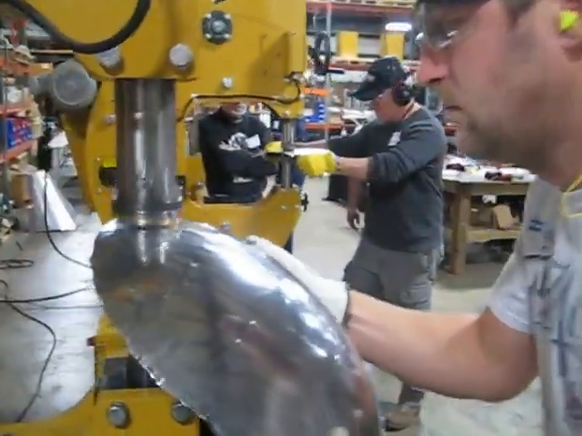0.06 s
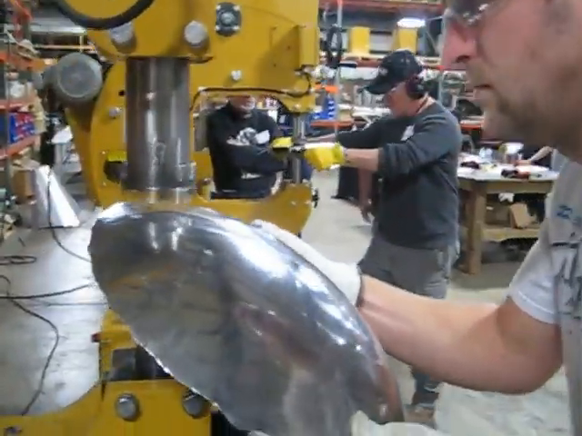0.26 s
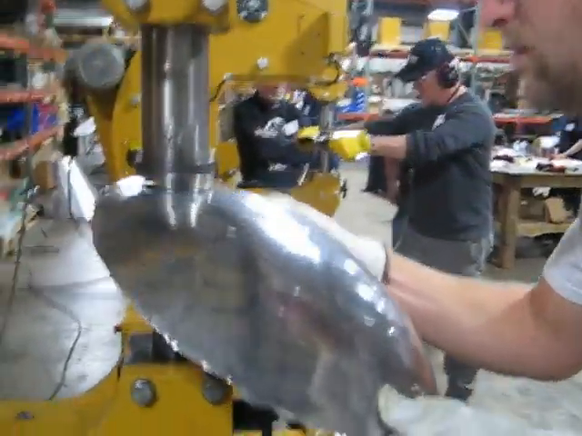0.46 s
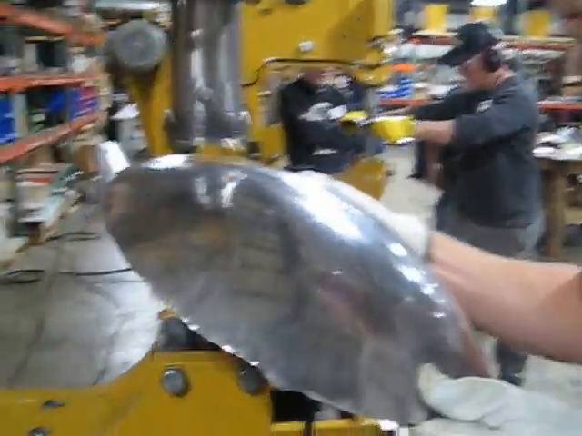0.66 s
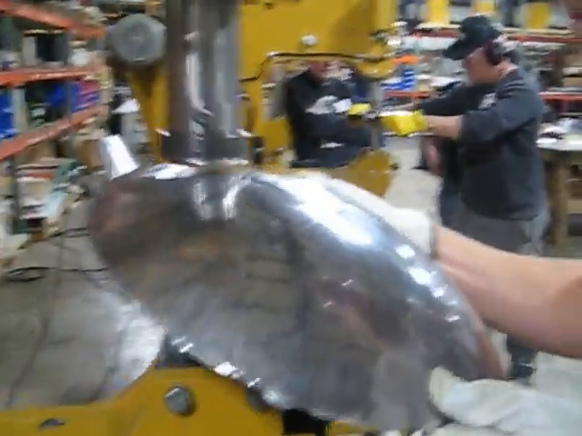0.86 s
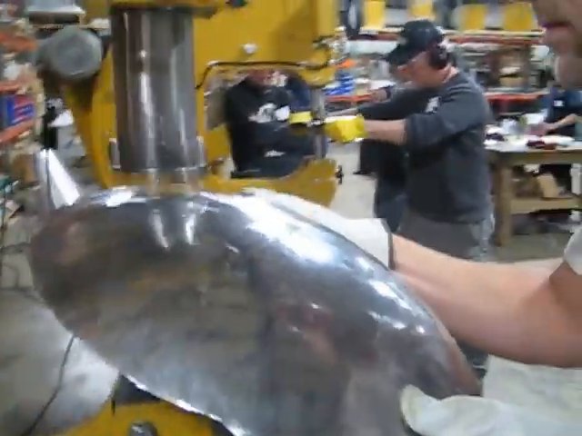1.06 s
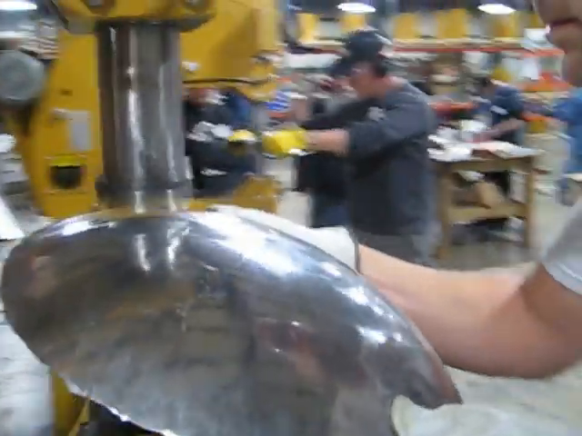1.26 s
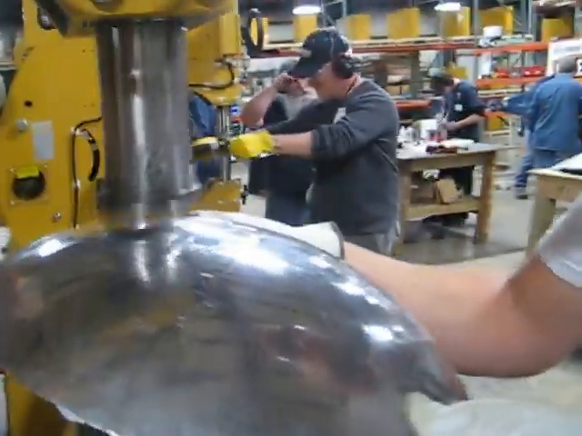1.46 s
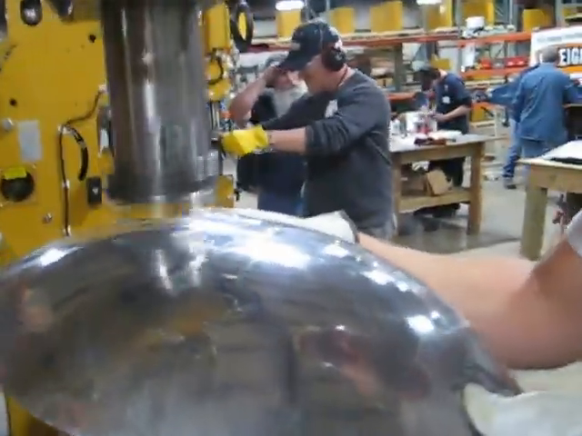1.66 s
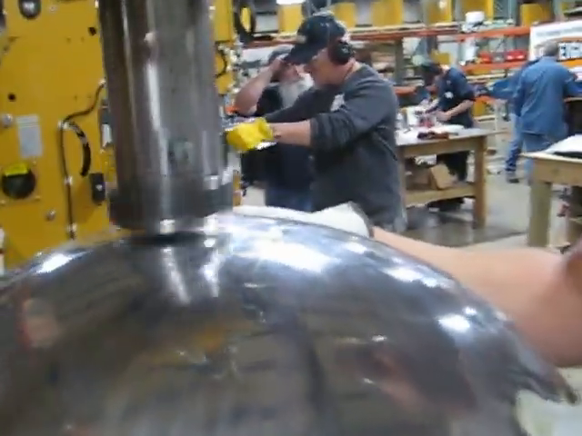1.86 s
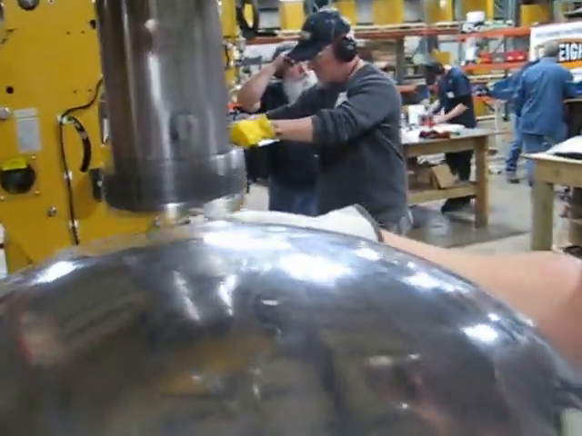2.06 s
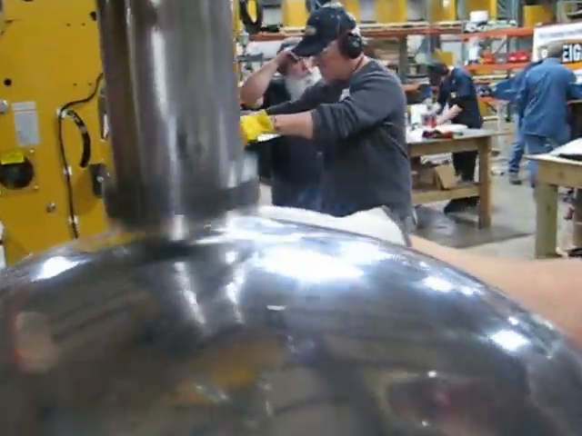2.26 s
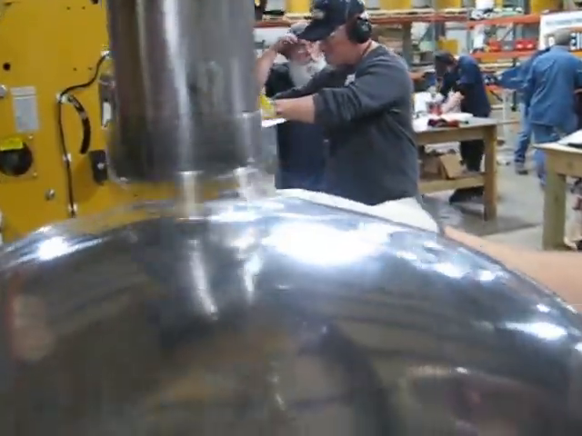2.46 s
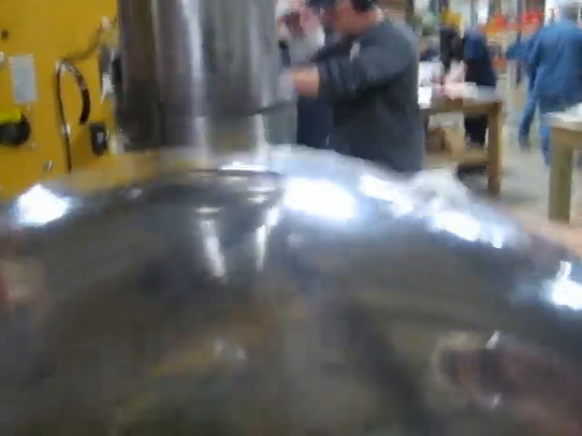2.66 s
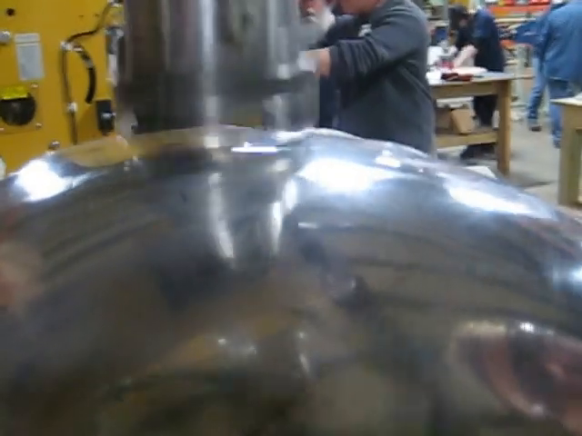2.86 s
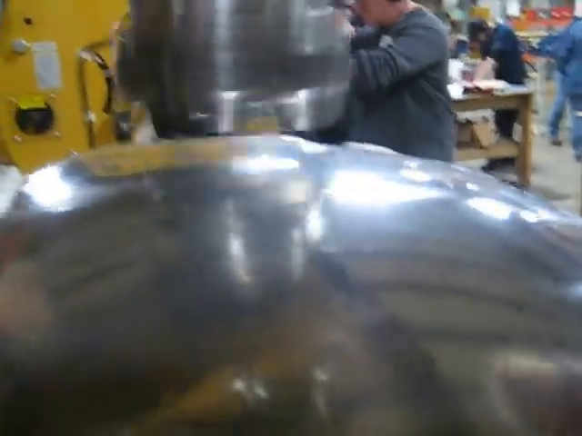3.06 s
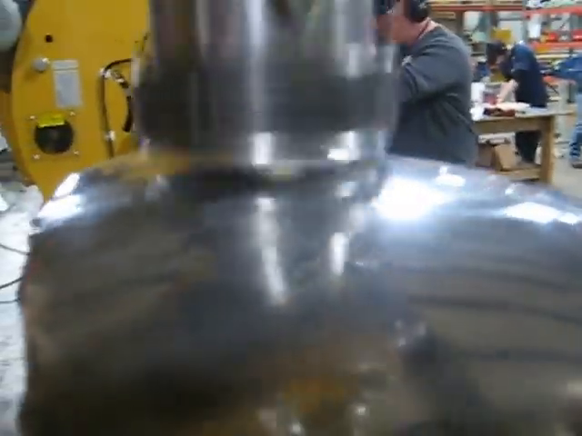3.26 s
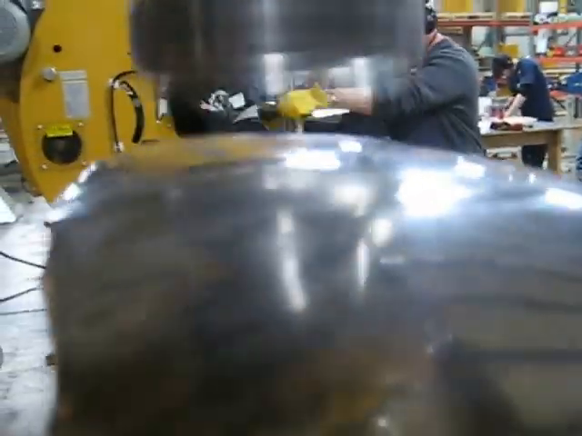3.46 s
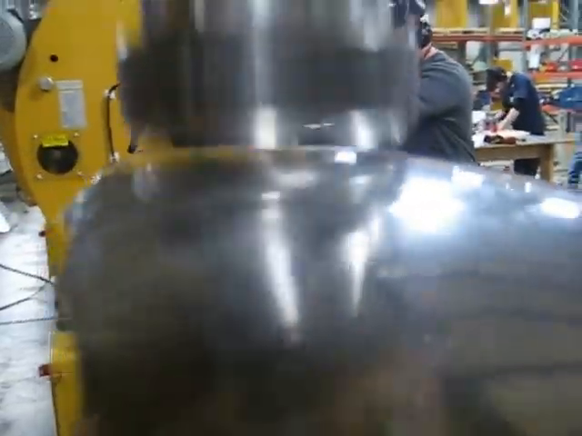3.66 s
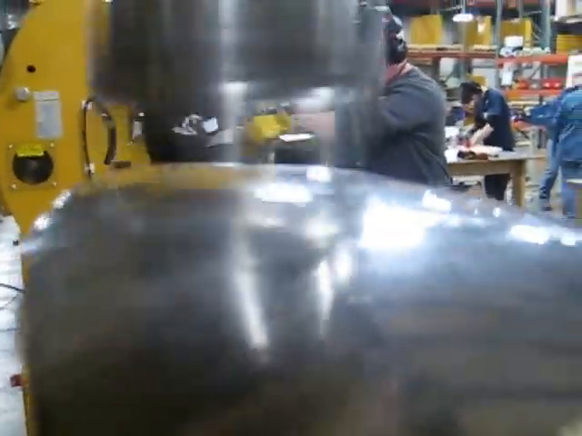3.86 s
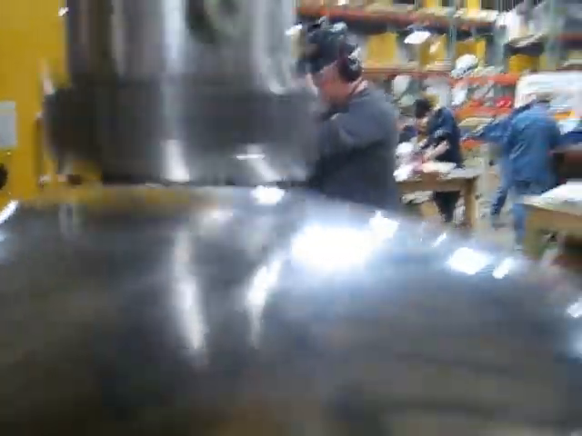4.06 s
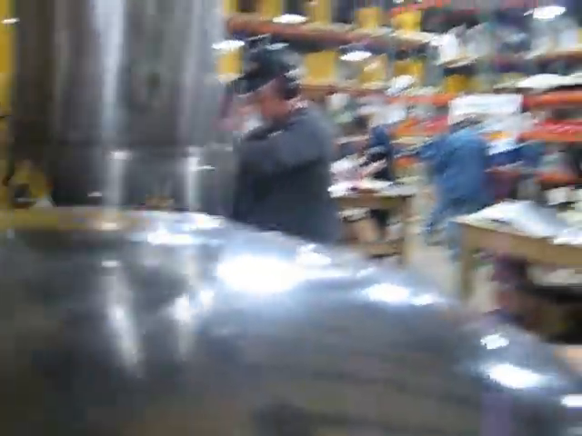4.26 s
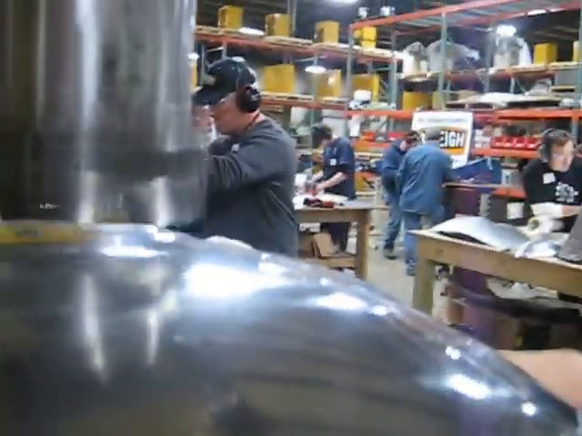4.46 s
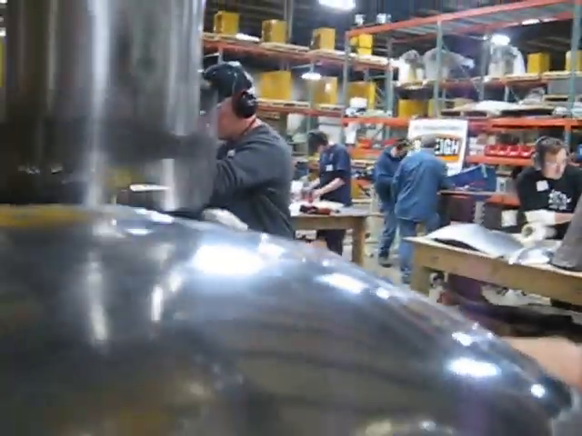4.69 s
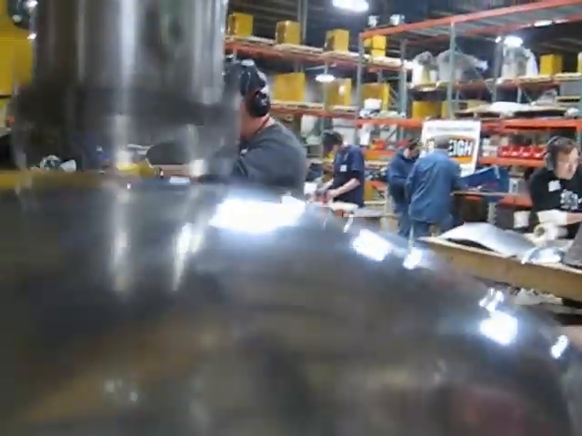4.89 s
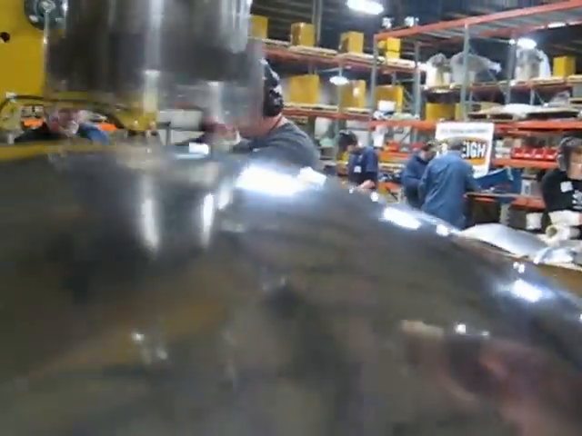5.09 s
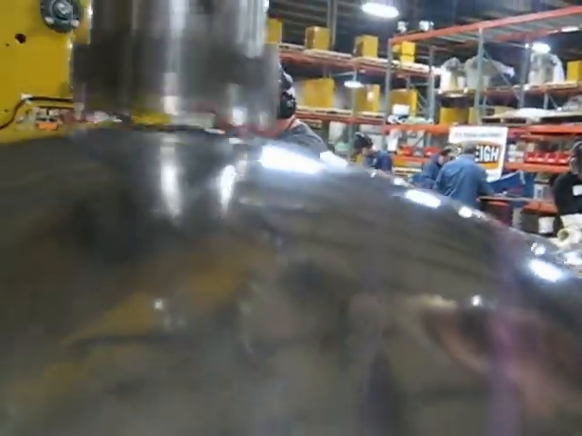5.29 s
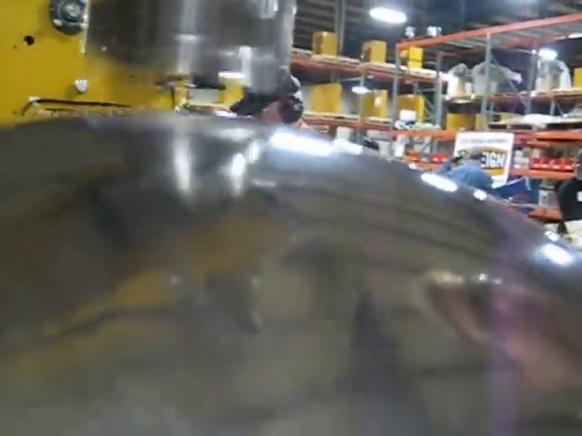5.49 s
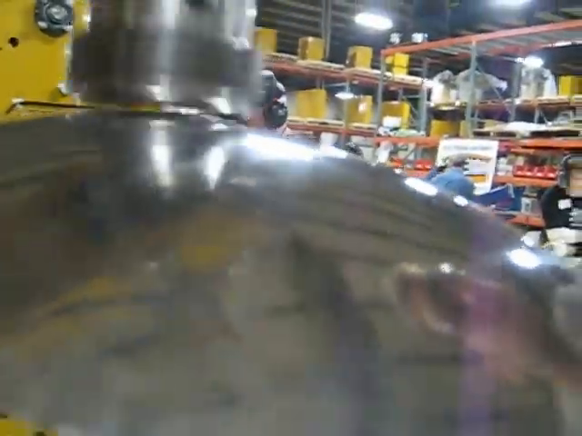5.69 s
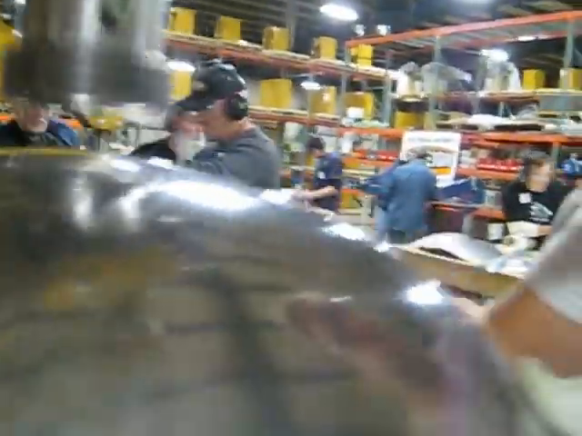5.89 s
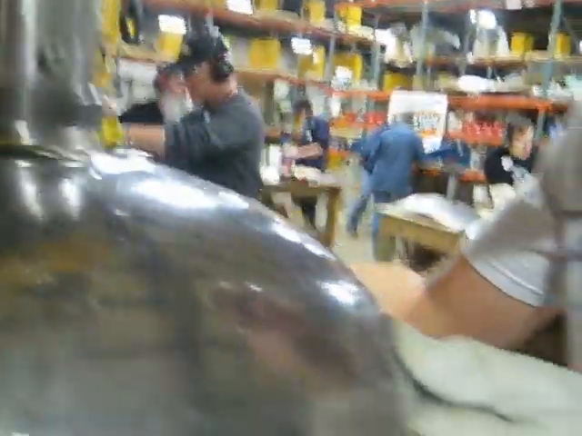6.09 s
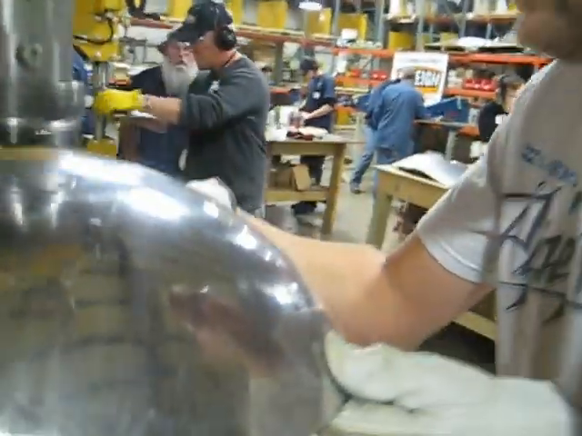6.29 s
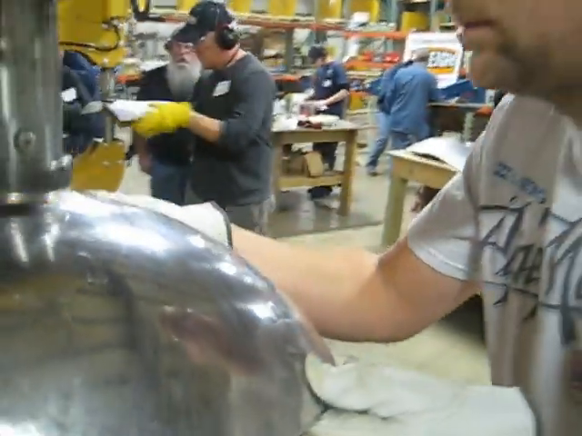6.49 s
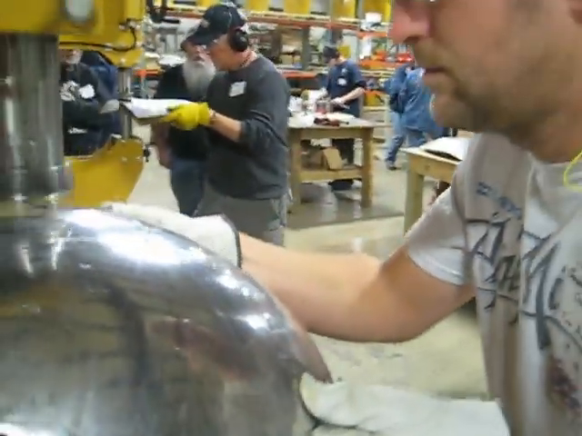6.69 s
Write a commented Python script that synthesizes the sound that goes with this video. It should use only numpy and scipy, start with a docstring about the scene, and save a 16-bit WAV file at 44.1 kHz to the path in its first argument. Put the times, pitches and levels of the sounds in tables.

```python
"""A power hammer planishes a domed, hand-damped metal panel, nearly thirteen blows a second, in a large workshop.
Each blow rings panel and dies (decaying modes, a hollow dome note, a clang, a noise crack and a rim chirp);
a panel caught off its seat thumps, and the linkage knocks before each blow.
Behind it lie a droning frame, the hall's decaying-noise reverberation and steady shop noise.
The microphone moves from arm's length to close by the dies, where air puffs reach it and peaks overload, then backs off."""
import sys
import numpy as np
from scipy import signal
from scipy.fft import rfft, irfft
from scipy.io import wavfile

SR = 44100
rng = np.random.default_rng(int(sys.argv[2]) if len(sys.argv) > 2 else 0)


def inscribe(sig):
    """Save sig as 16-bit PCM at rate SR to the path in sys.argv[1].

    A 1-D sig is mono; a 2-D sig holds one channel per row.
    Samples are clipped to [-1, 1] before scaling.
    """
    pcm = np.round(np.clip(np.atleast_2d(sig).T, -1, 1) * 32767)
    wavfile.write(sys.argv[1], SR, pcm.astype(np.int16))


N = 297234
LEAD = SR  # samples: a second of lead-in; the hammer starts about three quarters of a second early
TOTAL = N + LEAD
CUTOFF_HZ = 15800


def from_db(db):
    """Decibels to gain."""
    return 10 ** (np.asarray(db) / 20)


def at_time(points, s):
    """Read a curve at the given times."""
    return np.interp(s, *np.transpose(points))


def at_hz(points, hz):
    """Read the columns of a table along a log-frequency axis."""
    knots, *columns = np.transpose(points)
    return [np.interp(np.log(hz + 1e-9), np.log(knots), column) for column in columns]


def noise(colour, size):
    """Noise of rms 1 whose spectrum follows the given colour."""
    gain = from_db(at_hz(colour, np.fft.rfftfreq(size, 1 / SR))[0])
    x = irfft(rfft(rng.standard_normal(size)) * gain, size)
    return x / x.std()


def dying(t, t60):
    """Exponential decay, down 60 dB after t60 seconds."""
    return np.exp(-np.log(1000) * t / t60)


def nearest(times, wanted):
    """Which blow falls closest to each wanted time."""
    return np.abs(times[:, None] - wanted).argmin(axis=0)


def place(times, sounds):
    """Lay one sound at each time."""
    out = np.zeros(TOTAL + SR)
    for s, sound in zip(times, sounds):
        start = int(round(s * SR)) + LEAD
        out[start:start + len(sound)] += sound
    return out[:TOTAL]


# microphone position: t/s, closeness to the dies (0 = arm's length, 1 = close up)
MIC_CLOSENESS = [(0, 0), (.9, 0.05), (1.7, 0.23), (2.05, 0.35), (3.5, 1), (4.1, 0.93), (6.3, 0.54),
                 (6.74, 0.3)]


def closeness(s):
    """How near the microphone stands to the dies at the given times."""
    return at_time(MIC_CLOSENESS, s)


# the motor labours a little as the work goes on: t/s, rate/(blows per second)
BLOW_RATE = [(0, 12.8496), (3.2, 12.8606), (3.7, 12.7792), (4.2, 12.7252), (4.7, 12.7726), (5.3, 12.6521),
             (6.1, 12.6451)]
FIRST_BLOW_S = .0526


def beat(count=10):
    """One blow per turn of the crank, starting a few turns early."""
    times = [FIRST_BLOW_S - count / BLOW_RATE[0][1]]
    while times[-1] < N / SR:
        times.append(times[-1] + 1 / at_time(BLOW_RATE, times[-1]))
    return np.array(times[:-1])


# how hard the dies bite as the panel is fed along, before scatter: t/s, level/dB
BITE = [(0, -4), (.65, -3), (.92, -1.9), (1.2, -4), (1.7, -3.5), (1.87, -1.1), (2.2, -1), (2.6, 0.5),
        (3.2, 1.4), (3.65, -3), (4.05, 1.9), (4.4, -0.2), (4.88, 1.5), (5.45, -2.5), (5.8, -3.5), (6.1, -4),
        (6.25, -0.8), (6.74, -2.5)]
# treble against the rest of the blow, before scatter: t/s, level/dB
TREBLE = [(0, -1.5), (.95, -0.9), (1.5, 0.2), (1.92, -1), (2.15, 1), (2.7, 0), (3.2, 1), (3.62, 10),
          (4.05, 3.5), (5.35, 2), (5.97, 5.5), (6.4, 0), (6.74, -0.3)]
# air puff at the microphone, relative and before scatter: t/s, level/dB
PUFF_LEVEL = [(0, -35), (.9, -18), (2.1, -18), (2.95, -3.5), (3.9, -0.5), (4.7, -5), (5.7, -10),
              (6.05, -25), (6.74, -15)]
# pitch of the metal pinched between the dies, before scatter: t/s, f/Hz
PINCH_PITCH = [(0, 3450), (1.95, 3506), (2.06, 2360), (2.35, 2335), (2.55, 3340), (3.3, 3408), (4.2, 2863),
               (4.75, 2904), (4.92, 3630), (5.85, 3387), (5.98, 2375), (6.25, 2400), (6.4, 3110)]
# blows that catch the panel off its seat on the lower die:
# t/s, change of air puff level/dB, relative thump level/dB
OFF_SEAT_BLOWS = [(2.08, 9, -18.5), (2.54, 5, -30), (2.78, 7, -29), (3.16, 2.5, -25), (3.48, 3, -16),
                  (3.63, 3, -36), (4.1, 5.5, -24), (4.34, -9, -17), (4.89, 9, -27), (4.96, 8, -35),
                  (5.2, 8, -33), (5.91, 4, -12), (6.23, 20, -20), (6.54, 15, -34)]
# no two blows are quite alike
STRENGTH_SCATTER_DB, SHARP_SCATTER_DB, PUFF_SCATTER_DB = 0.74, 0.7, 3.5
CLANG_SCATTER_OCTAVES, TIMING_SCATTER_S = 0.1394, .0002
# the dome booms about equally however hard the bite: it gives back this share of the bite curve
BOOM_DB, BOOM_EVENNESS = -1.56, 0.92


def all_blows():
    """One row per blow: (s, strength dB, air puff dB, boom of the dome dB, sharpness dB, clang pitch Hz)."""
    s = beat()
    later, harder, sharper, puffier, higher = rng.standard_normal((len(s), 5)).T
    strength_db = at_time(BITE, s) + STRENGTH_SCATTER_DB * harder
    sharp_db = at_time(TREBLE, s) + SHARP_SCATTER_DB * sharper
    boom_db = BOOM_DB - BOOM_EVENNESS * at_time(BITE, s)
    clang_hz = at_time(PINCH_PITCH, s) * 2 ** (CLANG_SCATTER_OCTAVES * higher)
    # an off-seat blow has its own puff change in place of the random one
    off_s, off_db, _ = np.transpose(OFF_SEAT_BLOWS)
    extra_db = PUFF_SCATTER_DB * puffier
    extra_db[nearest(s, off_s)] = off_db
    puff_db = at_time(PUFF_LEVEL, s) + extra_db
    blow_s = s + TIMING_SCATTER_S * later
    return np.column_stack([blow_s, strength_db, puff_db, boom_db, sharp_db, clang_hz])


# spectrum of the workshop's background: f/Hz, relative level/dB per Hz
SHOP_COLOUR = [(25, -12), (100, -17), (200, -8), (600, -3), (1000, -2), (1800, -3), (3200, -3), (7000, -11),
               (12000, -22), (16000, -32)]


def shop_noise(level_db):
    """Steady workshop noise, coloured to its spectrum."""
    return from_db(level_db) * noise(SHOP_COLOUR, TOTAL)


# spectrum of the hall's answer: f/Hz, level/dB
HALL_COLOUR = [(60, -18), (220, -39), (450, -6.5), (630, 1), (900, -9), (1700, -14.5), (3200, -20),
               (7000, -58), (16000, -31)]
HALL_T60_S, NEAR_T60_S, NEAR_DB = 0.63, 0.19, -18


def workshop(x, first_echo_s, build_s):
    """Quick reflections from the machine frame and floor, then the long wash of the hall."""
    t = np.arange(SR) / SR
    near = rng.standard_normal(SR) * dying(t, NEAR_T60_S) * (t > first_echo_s)
    near = from_db(NEAR_DB) * near / np.linalg.norm(near)
    far = rng.standard_normal(SR) * dying(t, HALL_T60_S) * (1 - np.exp(-(t / build_s) ** 2))
    hall_gain = from_db(at_hz(HALL_COLOUR, np.fft.rfftfreq(SR, 1 / SR))[0])
    far = irfft(rfft(far / np.linalg.norm(far)) * hall_gain, SR)
    return signal.fftconvolve(x, near + far)[:TOTAL]


# the cast frame and drive, droning through every stroke: f/Hz, relative level/dB per Hz
FRAME_COLOUR = [(110, -30), (160, -14), (205, -3), (245, -6), (282, -2), (420, -4), (530, 0), (630, 5),
                (760, 3), (1050, -2), (1700, -7), (3200, -11), (7000, -24), (16000, -50)]


def frame(blows, level_db, t60, rise_s, size=7000):
    """The heavy frame is shaken alike on every stroke, so its drone repeats from blow to blow."""
    t = np.arange(size) / SR
    shudder = noise(FRAME_COLOUR, size) * dying(t, t60) * (1 - np.exp(-t / rise_s))
    shudder = shudder * signal.windows.tukey(size, 1 / 10)
    return from_db(level_db) * place(blows[:, 0], [shudder] * len(blows))


# play in the linkage, taken up on every downstroke: lead before the blow t/s, level/dB before scatter, t60/s
JOINT_KNOCKS = [(.025, -38, .1), (.015, -36, .1), (.0065, -33, .08)]
# spectrum of a knock: f/Hz, relative level/dB per Hz
JOINT_COLOUR = [(30, -12), (100, -7), (250, -13), (650, -16), (1500, 17), (3300, 16), (7000, 10),
                (11000, 6.5), (16000, -46)]


def linkage(blows, scatter_db, jitter_s, size=3000):
    """Slack joints knock in turn as the ram descends, each with its own level and decay, nearly alike every stroke."""
    t, out = np.arange(size) / SR, 0
    for early_s, level_db, t60 in JOINT_KNOCKS:
        late, louder = rng.standard_normal((len(blows), 2)).T
        knock = noise(JOINT_COLOUR, size) * dying(t, t60)
        gain = from_db(level_db + scatter_db * louder)[:, None]
        out = out + place(blows[:, 0] - early_s + jitter_s * late, gain * knock)
    return out


def air_puff(blows, level_db, swell_s, flex_hz, flex_db, flex_t60, size=2000):
    """The dome is pushed down, shoves one short pulse of air at the microphone and flexes back."""
    t = np.arange(size) / SR
    push = t / swell_s * np.exp(1 - t / swell_s)
    pitch_hz = flex_hz * np.exp(0.091 * rng.standard_normal((len(blows), 1)))
    flex = from_db(flex_db) * np.sin(2 * np.pi * pitch_hz * t) * dying(t, flex_t60)
    puffs = place(blows[:, 0], from_db(blows[:, 2:3] + level_db) * (push + flex))
    return signal.sosfilt(signal.butter(1, 25, "high", fs=SR, output="sos"), puffs)


def thump(blows, level_db, t60, rise_s, tilt_db, count=4, size=4000):
    """A panel held off its seat is slapped down onto the die, and the lowest listed modes thump briefly."""
    off_s, _, thump_db = np.transpose(OFF_SEAT_BLOWS)
    hz, t = np.array(LISTED_MODES)[:count, 0], np.arange(size) / SR
    # the tilt is in dB per octave
    gains = from_db(level_db + thump_db[:, None] + tilt_db * np.log2(hz / hz[-1]))
    turns = np.exp(2j * np.pi * rng.random(gains.shape))
    waves = np.exp(2j * np.pi * hz[:, None] * t) * dying(t, t60) * (1 - np.exp(-t / rise_s))
    return place(blows[nearest(blows[:, 0], off_s), 0], ((gains * turns) @ waves).real)


# the bending wave as it leaves the rim: f/Hz, relative level/dB
RIM_SPECTRUM = [(150, -20), (430, 6), (560, 19), (780, 23), (930, 18), (1080, 27), (1250, 27), (1550, 15),
                (2200, 12), (3300, 21), (5000, 12), (8000, 8), (16000, -8)]
# modes near 1.2 kHz, which depend on where the die lands; the rim wave follows too: t/s, level/dB
MIDRANGE_LEVEL = [(0, -0.5), (1.4, 0), (2.05, -5), (2.7, -1), (3.4, 2.5), (4.4, 0.5), (4.85, 3.5),
                  (5.3, -1), (6.15, -3.5), (6.7, 0.5)]


def rim_wave(blows, travel_s, dispersion, close_db, size=4096):
    """High bending waves reach the rim first and low ones last: a quick falling chirp, plainest at arm's length."""
    hz = np.fft.rfftfreq(size, 1 / SR)
    delay_s = travel_s * (1000 / np.maximum(hz, 350)) ** dispersion
    # adding up the delay over frequency gives the phase
    phase = -2 * np.pi * np.cumsum(delay_s) * hz[1]
    spectrum = from_db(at_hz(RIM_SPECTRUM, hz)[0]) * np.exp(1j * phase)
    chirp = irfft(spectrum, size)[:size // 2]
    s, strength_db, _, boom_db, _, _ = blows.T
    level_db = strength_db + boom_db + at_time(MIDRANGE_LEVEL, s) + closeness(s) * close_db
    return place(s, from_db(level_db)[:, None] * chirp)


def clang(blows, level_db, close_db, t60, overtone, overtone_db, rise_s, size=2400):
    """The metal pinched between the dies rings briefly at a pitch of its own, with one overtone."""
    s, strength_db, _, _, sharp_db, hz = blows.T[:, :, None]
    t = np.arange(size) / SR
    low = np.sin(2 * np.pi * hz * t) * dying(t, t60)
    high = np.sin(2 * np.pi * overtone * hz * t) * dying(t, t60 / 2)
    ring = low + from_db(overtone_db + sharp_db) * high
    gain = from_db(level_db + strength_db + closeness(s) * close_db)
    return place(s[:, 0], gain * ring * (1 - np.exp(-t / rise_s)))


def crack(blows, level_db, t60, edge_hz, size=600):
    """Steel meets steel: a bright snap of a few milliseconds, noise filtered to one octave."""
    bursts = rng.standard_normal((len(blows), size)) * dying(np.arange(size) / SR, t60)
    gain = from_db(level_db + blows[:, 1:2] + blows[:, 4:5])
    snaps = place(blows[:, 0] + .0005, gain * bursts)
    return signal.sosfilt(signal.butter(2, [edge_hz, 2 * edge_hz], "band", fs=SR, output="sos"), snaps)


# the patch of dome around the dies, moving in pitch as the panel is fed along:
# t/s, f/Hz before scatter, level/dB
DOME_PATCH = [(0, 585, -29), (1.6, 670, -24), (1.95, 595, -18.5), (2.4, 668, -16), (2.95, 690, -23),
              (3.45, 730, -21), (4.3, 733, -30), (4.8, 743, -16), (5.3, 750, -36), (5.6, 524, -11.5),
              (5.92, 549, -13.5), (6.25, 695, -15), (6.74, 750, -24)]


def dome(blows, t60, lag_s, scatter_octaves, size=4000):
    """One hollow note per blow, pitched by the spot under the die."""
    knots, hz, level_db = np.transpose(DOME_PATCH)
    s, t = blows[:, :1], np.arange(size) / SR
    pitch_hz = np.interp(s, knots, hz) * 2 ** (scatter_octaves * rng.standard_normal(s.shape))
    notes = from_db(np.interp(s, knots, level_db)) * np.sin(2 * np.pi * pitch_hz * t)
    return place(s[:, 0] + lag_s, notes * dying(t, t60) * (1 - np.exp(-t / lag_s)))


def wander(likeness, count):
    """Complex strength of each mode, changing from blow to blow as the strike point travels."""
    fresh = rng.standard_normal((count, len(likeness), 2)) @ [1, 1j] / np.sqrt(2)
    rows = [fresh[0]]
    for step in fresh[1:]:
        rows.append(likeness * rows[-1] + np.sqrt(1 - likeness ** 2) * step)
    return np.array(rows)


# what the midrange modes lose, their neighbours gain: f/Hz, share of the midrange level (dB per dB)
MIDRANGE_SPREAD = [(300, -0.12), (560, -0.7), (800, -0.15), (1020, 0.63), (1450, 0.84), (1750, 0.66),
                   (2200, -1.2), (2800, 0.042)]
BOOM_EDGE_HZ, SHARP_EDGE_HZ = 1660, 4800


def ringing(blows, modes, steady, spread_s, shift_hz, size):
    """Every blow sets all the modes ringing; a share of each mode is the same wherever the die lands."""
    s, strength_db, _, boom_db, sharp_db, _ = blows.T[:, :, None]
    hz, far_db, close_db, t60 = modes
    # each mode is heard according to where the microphone is and how hard the blow falls
    level_db = far_db + closeness(s) * (close_db - far_db) + strength_db
    level_db = level_db + boom_db / (1 + (hz / BOOM_EDGE_HZ) ** 4)
    level_db = level_db + sharp_db / (1 + (SHARP_EDGE_HZ / hz) ** 4)
    level_db = level_db + at_time(MIDRANGE_LEVEL, s) * at_hz(MIDRANGE_SPREAD, hz)[0]
    # short bending waves feel a small move of the panel most
    likeness = np.exp(-(hz / shift_hz) ** 2 - 1 / 20)
    fixed_part = np.sqrt(steady) * np.exp(2j * np.pi * rng.random(len(hz)))
    shape = fixed_part + np.sqrt(1 - steady) * wander(likeness, len(s))
    # long bending waves travel slowly, so lower modes take longer to fill the panel; alike below 1 kHz
    t = np.arange(size) / SR
    rise_s = spread_s * 1000 / np.maximum(hz, 1000)[:, None]
    waves = np.exp(2j * np.pi * hz[:, None] * t) * dying(t, t60[:, None]) * (1 - np.exp(-t / rise_s))
    return place(s[:, 0], ((from_db(level_db) * shape) @ waves).real)


# separately listed modes of panel and dies:
# f/Hz, relative level/dB at arm's length, relative level/dB close up, t60/s
LISTED_MODES = [(204, -41, -43, .25), (282, -40, -35.5, .25), (343, -34, -34, .3), (432, -38, -32, .09),
                (577, -30, -31, .16), (640, -29, -30, .22), (692, -31, -33, .1), (757, -24, -23, .13),
                (843, -22, -28, .15), (1068, -23, -25, .11), (1155, -25, -26, .08), (1275, -22, -22, .1),
                (1345, -27, -25, .09), (1455, -29, -35, .09), (1522, -38, -29, .11), (1645, -28, -30, .09),
                (2025, -28, -20, .085), (2460, -25, -18, .065), (2790, -23, -16, .065),
                (2940, -20, -13, .08), (3120, -18, -15, .07), (3290, -19, -18, .065), (3620, -17, -15, .05),
                (4010, -20, -18, .05), (5780, -22, -18, .035), (6930, -29, -14, .03)]
# the panel's dense crowd of modes, a curve to read between:
# f/Hz, relative level/dB of each at arm's length, the same close up, t60/s
CROWD_CURVE = [(181.3, -57, -42.5, 0.042), (465, -29.5, -17.5, 0.069), (1030, -38, -22, 0.1),
               (1630, -30, -29.5, 0.082), (2290, -24.5, -18, 0.075), (3700, -17.5, -18.5, 0.058),
               (5070, -26, -27, 0.059), (6340, -20, -22, 0.042), (9030, -27.5, -30, 0.035),
               (13140, -37, -43, 0.046), (16400, -52, -56, 0.073)]
CROWD_COUNT = 560


def panel(blows):
    """Separately listed modes, and a dense crowd of evenly scattered modes that makes the clash."""
    hz = np.linspace(CROWD_CURVE[0][0], CUTOFF_HZ, CROWD_COUNT)
    hz = hz + (hz[1] - hz[0]) * rng.uniform(-0.32, 0.57, CROWD_COUNT)
    crowd_modes = [hz, *at_hz(CROWD_CURVE, hz)]
    listed = ringing(blows, np.transpose(LISTED_MODES), steady=0.51, spread_s=0.0011, shift_hz=4000, size=8000)
    crowd = ringing(blows, crowd_modes, steady=0.33, spread_s=0.0025, shift_hz=3000, size=3600)
    return listed + from_db(-3.5) * crowd


def scene():
    """Hammer and panel in the hall, over the steady noise of the shop."""
    blows = all_blows()
    metal = panel(blows)
    metal = metal + dome(blows, t60=0.064, lag_s=0.00098, scatter_octaves=0.099)
    metal = metal + crack(blows, level_db=-9.5, t60=0.014, edge_hz=5070)
    metal = metal + clang(blows, level_db=-9, close_db=7.0, t60=0.034,
                          overtone=2.08, overtone_db=-11, rise_s=0.0011)
    metal = metal + rim_wave(blows, travel_s=.0076, dispersion=1.05, close_db=-10)
    metal = metal + thump(blows, level_db=0.5, t60=0.037, rise_s=0.00073, tilt_db=10.5)
    machine = metal + linkage(blows, scatter_db=1.5, jitter_s=.00015)
    # the hall is fed up to 4 dB less close up, against the rise of the direct sound
    close = closeness((np.arange(TOTAL) - LEAD) / SR)
    hall = workshop(machine * from_db(-4 * close), first_echo_s=0.0053, build_s=0.012)
    drone = frame(blows, level_db=-27, t60=0.36, rise_s=0.0057)
    puffs = air_puff(blows, level_db=-21.0, swell_s=0.00055, flex_hz=353, flex_db=1.5, flex_t60=0.011)
    mix = machine + hall + drone + puffs + shop_noise(level_db=-33)
    return mix[None, LEAD:]


def overload(x, top, order):
    """Peaks are flattened at the top of the microphone's range."""
    return x / (1 + (x / top) ** order) ** (1 / order)


def record(dry):
    """The loudest blows overload the microphone; the highest treble is cut."""
    low_pass = signal.cheby1(12, .05, CUTOFF_HZ, fs=SR, output="sos")
    return signal.sosfiltfilt(low_pass, overload(dry, top=.92, order=6))


dry = scene()
out = record(dry)
inscribe(out)
```